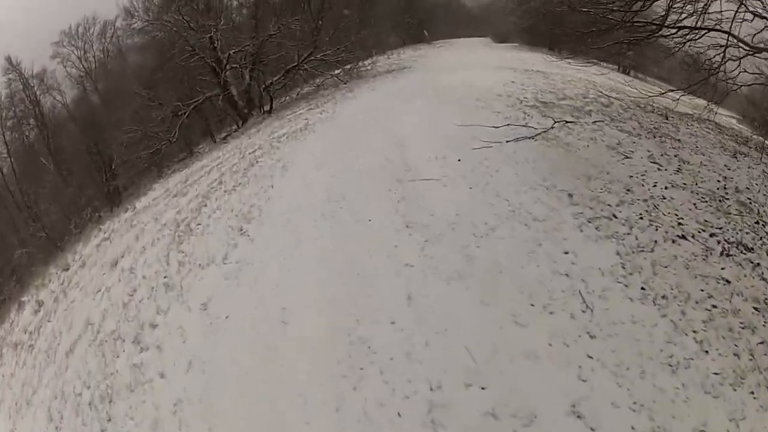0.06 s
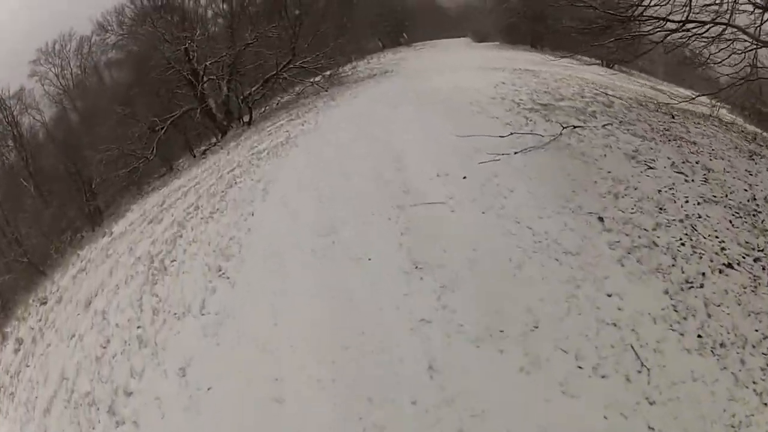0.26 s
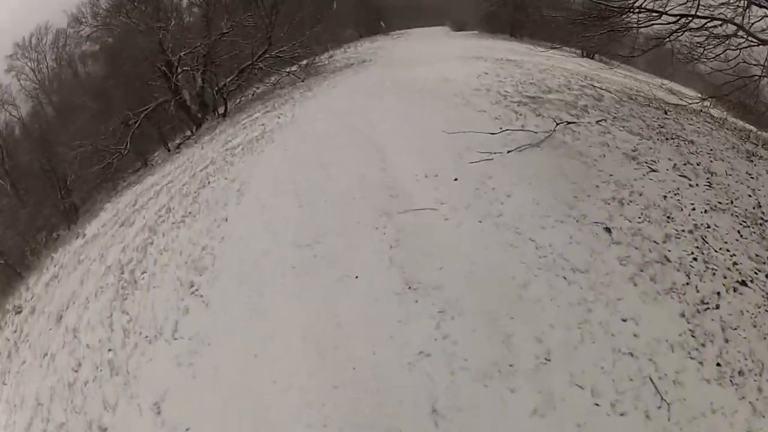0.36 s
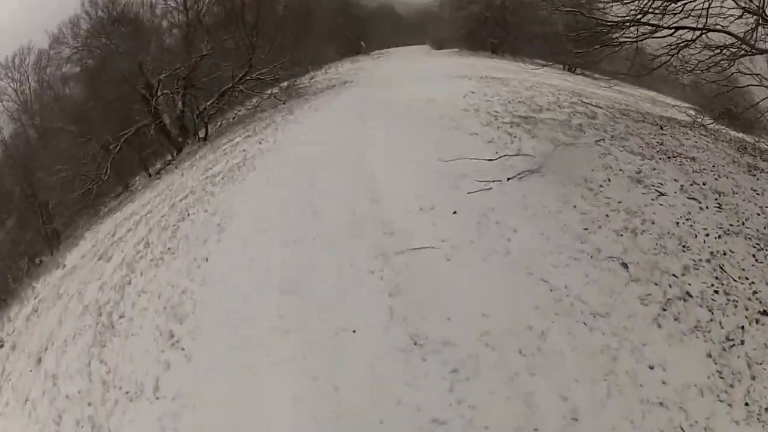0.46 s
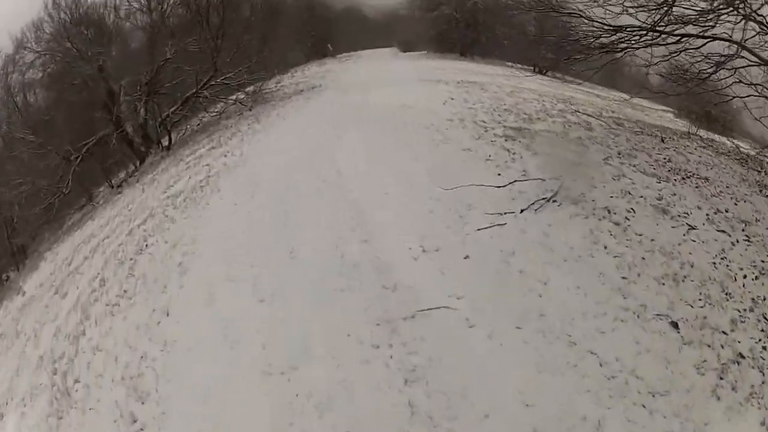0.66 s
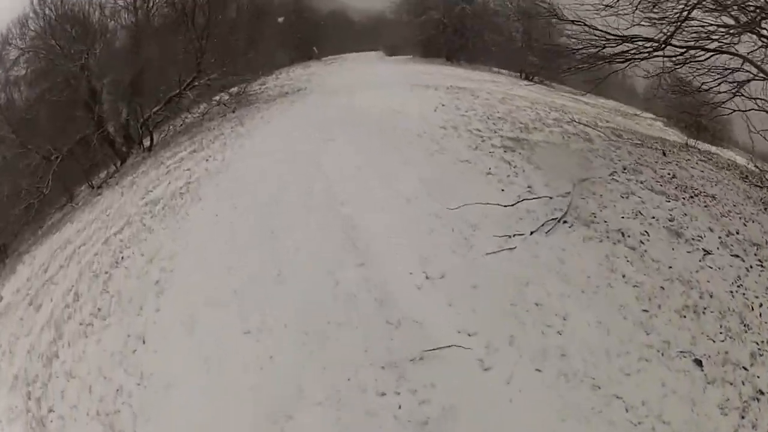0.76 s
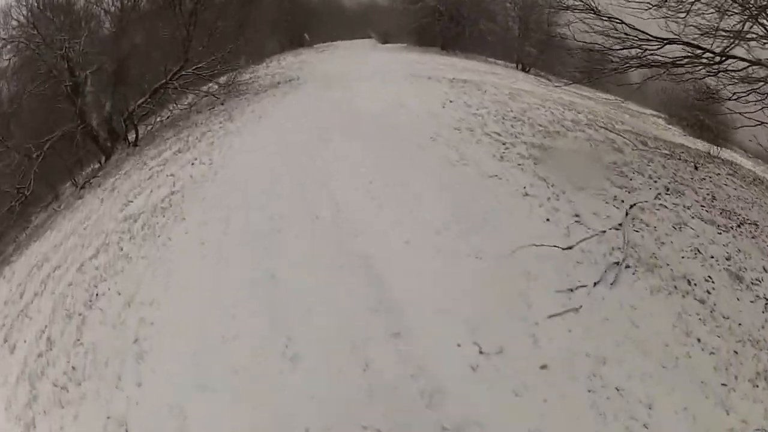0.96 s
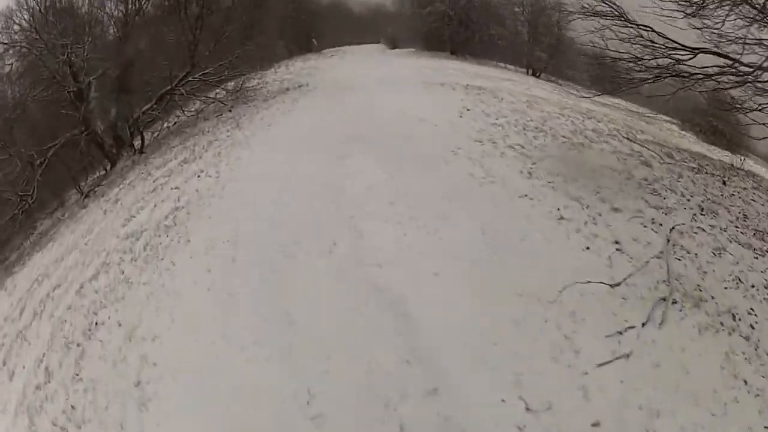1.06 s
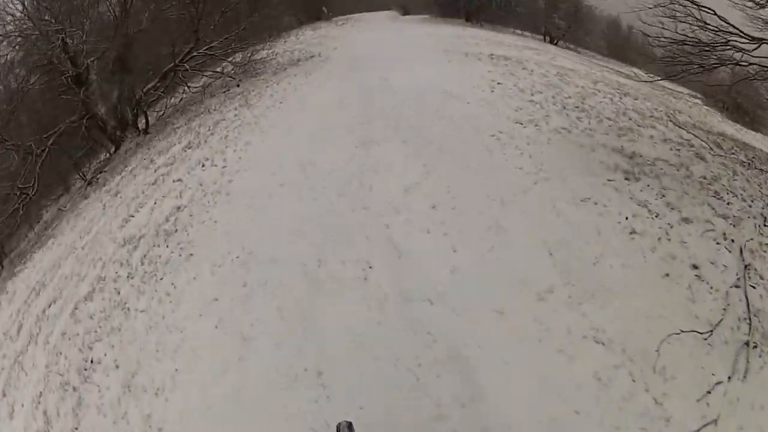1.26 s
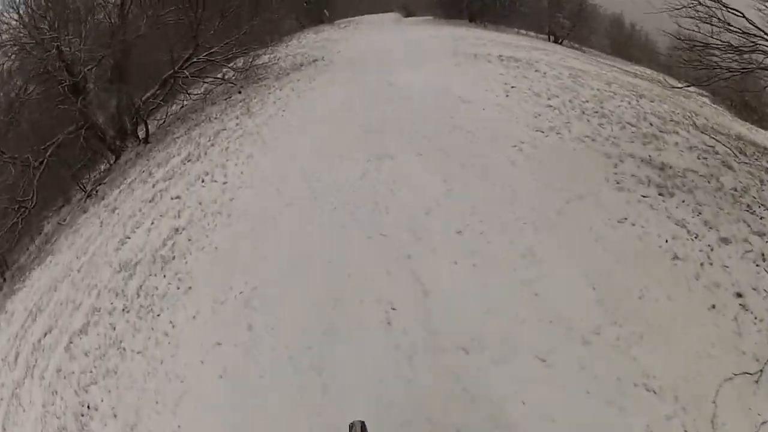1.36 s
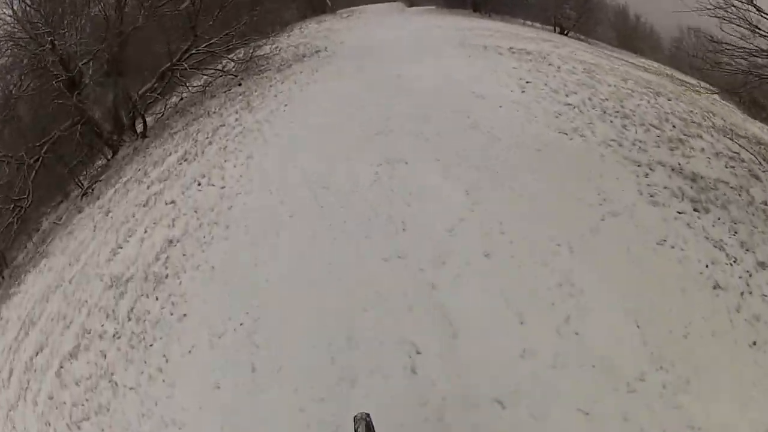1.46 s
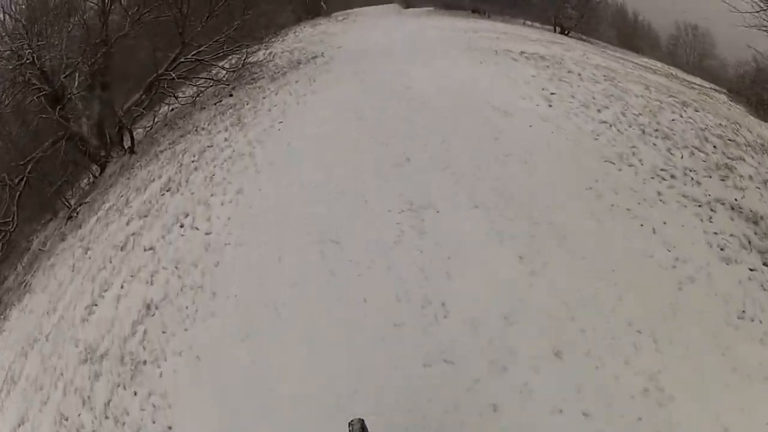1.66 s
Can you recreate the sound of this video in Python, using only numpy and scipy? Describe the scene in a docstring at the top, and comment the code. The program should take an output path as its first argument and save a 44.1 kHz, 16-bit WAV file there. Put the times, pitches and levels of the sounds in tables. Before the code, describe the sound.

A bicycle rolls over crusty snow, heard close and dry from on board. Irregular clicks, pops and light chain rattles sit over a low rumble. Halfway through, the microphone mount knocks hard, then the ticking carries on.

```python
"""Bicycle on thin snow

Heard from a camera riding on the bike. The tyres hiss, pop and crunch through crust, and flick
grit and frozen crumbs against the bike. Bumps thump through the camera mount, shake the chain
and set a small metal part ringing. The mount knocks, once hard. A low rumble lies underneath."""
import sys
import numpy as np
from scipy import signal
from scipy.fft import rfft, irfft, next_fast_len
from scipy.io import wavfile

SR = 44100
rng = np.random.default_rng(int(sys.argv[2]) if len(sys.argv) > 2 else 0)


def wav_out(sig):
    """Save sig, one row per channel (or a flat mono array), as 16-bit PCM at SR to the path in sys.argv[1]."""
    wavfile.write(sys.argv[1], SR, np.round(np.clip(np.atleast_2d(sig).T, -1, 1) * 32767).astype(np.int16))


N = 74970
T = np.arange(SR // 5) / SR  # time within one event, s


def amp(db):
    """Decibels to gain."""
    return 10 ** (np.asarray(db) / 20)


def unit_rms(x):
    """Scale to rms 1."""
    return x / np.sqrt(np.mean(x ** 2) + 1e-20)


def unit_hit(x):
    """Scale to the energy of 3 ms at rms 1."""
    return x * np.sqrt(0.003 * SR) / np.linalg.norm(x)


def gain_curve(rows):
    """Gain per sample from (t/s, level/dB) rows."""
    return amp(np.interp(np.arange(N) / SR, *np.transpose(rows)))


def colour(x, spectrum, tilt_db_oct=0):
    """Minimum-phase filter through (f/Hz, gain/dB) points, plus a tilt."""
    size = 2 * next_fast_len(len(x))
    octave = np.log2(np.fft.rfftfreq(size, 1 / SR) + 1)
    hz, db = np.transpose(spectrum)
    tilt_db = tilt_db_oct * np.maximum(octave - np.log2(hz[0]), 0)
    gain = amp(np.interp(octave, np.log2(hz), db) + tilt_db)
    cepstrum = irfft(np.log(gain))
    cepstrum[1:size // 2] *= 2
    cepstrum[size // 2 + 1:] = 0
    return irfft(rfft(x, size) * np.exp(rfft(cepstrum)))[:len(x)]


def decay(t60_s):
    """Exponential envelope."""
    return 1000 ** (-T / t60_s)


def burst(t60_s):
    """Decaying noise."""
    return unit_hit(rng.standard_normal(len(T)) * decay(t60_s))


def ring(modes):
    """Damped sines from (f/Hz, level/dB, t60/s) rows."""
    return sum(amp(db) * decay(t60_s) * np.sin(2 * np.pi * hz * T) for hz, db, t60_s in modes)


def place(events):
    """Sum (t/s, sound) pairs into N samples."""
    track = np.zeros(N + SR)
    for start_s, sound in events:
        track[max(round(start_s * SR), 0):][:len(sound)] += sound
    return track[:N]


# Rumble spectrum: f/Hz, density/dB
RUMBLE_SPECTRUM = [(15, 3.5), (30, 5), (60, -4), (88, 0), (125, -14), (180, -16), (300, -21.5),
                   (700, -50.5)]
# Rumble envelope: t/s, level/dB
RUMBLE_ENVELOPE = [(0, -45.5), (.14, -51), (.27, -47), (.36, -46.5), (.62, -45.5), (.7, -48), (.95, -42),
                   (1.02, -52), (1.13, -45), (1.2, -50.5), (1.33, -54), (1.45, -45.5), (1.57, -54.5),
                   (1.7, -44)]


def rumble():
    """Low, uneven noise of the ride."""
    return gain_curve(RUMBLE_ENVELOPE) * unit_rms(colour(rng.standard_normal(N), RUMBLE_SPECTRUM))


# Bumps: t/s, level/dB, f/Hz, rise/s
BUMP_HITS = [(0.309, -25, 81.6, 0.011), (0.467, -33, 46, 0.0095), (0.505, -24, 35.7, 0.011),
             (0.604, -35.5, 79.5, 0.017), (0.809, -30.5, 38, 0.017), (0.813, -31.5, 87, 0.0085),
             (0.871, -45.5, 201, 0.0056), (0.895, -30.5, 92, 0.017), (.899, -35, 178, 0.0028),
             (0.889, -33.5, 44.6, 0.012), (1.065, -33, 70.2, 0.016)]


def bumps():
    """Thumps through the mount; each swells and dies within a few cycles."""
    thumps = []
    for start_s, db, hz, rise_s in BUMP_HITS:
        swell = (T / rise_s * np.exp(1 - T / rise_s)) ** 2
        thumps.append((start_s, amp(db) * swell * np.sin(2 * np.pi * hz * T)))
    return place(thumps)


def metal(hz=12030, t60_s=0.09, re_bump_db=-37):
    """Every bump sets a small metal part ringing, faint and shivering."""
    tone = ring([(hz, 0, t60_s)])
    return place((start_s, amp(db + re_bump_db) * unit_hit(signal.fftconvolve(tone, burst(t60_s))))
                 for start_s, db, _, _ in BUMP_HITS)


# Link resonances: f/Hz, gain/dB
LINK_RESPONSE = [(1000, -7), (3000, -6), (4000, -10), (4750, -1), (5380, 6), (6000, -17), (6650, 4),
                 (7300, -6), (8000, -13), (11000, -18), (16000, -25)]


def chink(length_s, clacks_per_s=630, count=20):
    """Links collide in a quick, uneven, fading run."""
    gaps, sizes = rng.uniform(0.5, 2, (2, count))
    times_s = (np.cumsum(gaps) - gaps[0]) / clacks_per_s
    impulses = sizes * rng.choice([-1, 1], count) * np.exp(-(times_s / length_s) ** 2)
    clacks = place(zip(times_s, impulses[:, None]))[:len(T)]
    return unit_hit(colour(clacks, LINK_RESPONSE))


# Chain chinks: t/s, level/dB, length/s
CHAIN_HITS = [(0.398, -53, .008), (0.457, -45.5, 0.011), (0.5027, -44.5, 0.013), (.558, -53.5, 0.0058),
              (0.605, -44.5, 0.009), (0.776, -49.5, 0.009), (0.802, -46, 0.012), (0.8676, -43.5, 0.011),
              (0.921, -48.5, 0.012), (1.063, -50.5, 0.009), (1.098, -50, 0.009), (1.148, -54, 0.006),
              (1.2515, -46, 0.014)]


def chain():
    """The shaken chain chinks."""
    return place((start_s, amp(db) * chink(length_s)) for start_s, db, length_s in CHAIN_HITS)


# Bike struck by a speck: f/Hz, gain/dB
BIKE_RESPONSE = [(500, -16), (1100, -0.5), (1700, 1.5), (2100, -5.5), (2570, 2.5), (2950, -2), (3380, 7),
                 (4100, -6), (4780, 1.5), (6000, -16), (7250, -1.5), (7900, -11.5), (8600, -2.5),
                 (10200, -13), (12000, -29), (14400, -10), (16000, -27)]


def tick(tilt_db_oct=0, scatter_db=1.3, tail_db=-2.5):
    """A hard speck strikes and crumbles, ringing the bike a little differently each time."""
    response = [(hz, db + scatter_db * rng.standard_normal()) for hz, db in BIKE_RESPONSE]
    strike = unit_hit(T == 0) + amp(tail_db) * burst(t60_s=0.015)
    return unit_hit(colour(strike, response, tilt_db_oct))


# Grit impacts: t/s, level/dB, tilt/(dB/octave)
GRIT_HITS = [(.051, -59, 8), (0.059, -52.5, -0.5), (0.0658, -56, -5), (0.101, -51, -0.5),
             (.113, -56.5, -0.5), (.124, -56, -2), (.156, -58, -0.5), (.1675, -57, 2), (.19, -48.5, 0.5),
             (.2025, -46, -1), (0.2213, -48.5, -0.5), (0.2662, -45.5, -7.5), (0.3537, -40.5, 0.5),
             (0.3665, -53, -0.5), (0.3817, -52, 0), (.5852, -49, -5), (0.6045, -47.5, 1), (.7, -57, 3.5),
             (.784, -49, -1.5), (.82, -43, -5), (0.853, -51, -1), (0.8683, -42.5, 0), (0.873, -46.5, -3.5),
             (0.894, -50.5, -7), (.912, -45.5, -0.5), (0.9334, -42.5, 0), (1.0047, -54.5, -3),
             (1.028, -49, -1.5), (1.063, -49, -5.5), (1.092, -49, -0.5), (1.1286, -55, -1.5),
             (1.2, -42.5, -1.5), (1.209, -37.5, 0.5), (1.3202, -65, 8), (1.427, -29, -0.5), (1.451, -57, 0),
             (1.4902, -61, -9), (1.524, -56, -1), (1.561, -46, -5.5), (1.6872, -47.5, -2)]


def grit():
    """Specks flung by the tyres tick sharply on the bike."""
    return place((start_s, amp(db) * tick(tilt)) for start_s, db, tilt in GRIT_HITS)


# Snow grain breaking: f/Hz, density/dB
CRUSH_SPECTRUM = [(200, -5), (500, 5.5), (700, -7.5), (1100, 2.5), (1900, 13.5), (2600, -5), (3400, 1.5),
                  (4300, -10), (5200, -21), (6000, -24), (7000, -27), (10200, -5.5), (12000, -27),
                  (14000, -4), (16000, -24)]
# High ring of a ping: f/Hz, level/dB, t60/s
PING_MODES = [(2850, -39, 0.002), (3300, -8, 0.011), (8580, 2, 0.024), (10100, 9, 0.015), (13760, 6, 0.015)]


def ping(hz, cycles, crush_db, ring_db=-12.5, attack_s=0.00048):
    """A soft lump breaks: brief tone, short crush, faint high ring."""
    tone = np.sin(2 * np.pi * hz * T) * decay(cycles / hz) * (1 - np.exp(-T / attack_s))
    crush = unit_hit(colour(burst(t60_s=0.037), CRUSH_SPECTRUM))
    high_ring = unit_hit(ring(PING_MODES))
    return unit_hit(unit_hit(tone) + amp(crush_db) * crush + amp(ring_db) * high_ring)


# Crumb impacts: t/s, level/dB, f/Hz
CRUMB_HITS = [(.067, -46.5, 952), (0.1402, -48, 1760), (.19, -56, 1840), (0.2025, -44.5, 1030),
              (0.232, -49, 2040), (0.2428, -38.5, 1765), (0.267, -46, 1700), (0.3168, -43, 1460),
              (.338, -49, 1980), (.44, -49.5, 1690), (0.494, -44.5, 1915), (0.5835, -44.5, 2200),
              (0.7, -48.5, 1890), (.716, -51, 1700), (0.959, -48.5, 2030), (0.971, -48, 1960),
              (1.0135, -46.5, 1100), (1.013, -50, 1620), (1.05, -48, 830), (1.2326, -35, 1773),
              (1.32, -48, 1790), (1.369, -49, 830), (1.41, -48.5, 1680), (1.427, -39.5, 1130),
              (1.4583, -49.5, 1930), (1.4902, -49, 1830), (1.537, -38, 1770), (1.55, -49, 1700),
              (1.5796, -47, 1880), (1.674, -47, 1870)]


def crumbs():
    """Larger lumps of snow hit the bike with duller pings."""
    return place((start_s, amp(db) * ping(hz, cycles=22, crush_db=-3)) for start_s, db, hz in CRUMB_HITS)


def pops(per_s=105, spread_db=3, centre_hz=1934, spread_oct=0.43, edge_db=-6):
    """Snow grains pop at random under the tread, some harder than others; rms 1."""
    count = round(per_s * N / SR)
    edge = amp(edge_db) * tick()
    grains = []
    for size, pitch, edge_gain in np.clip(rng.standard_normal((count, 3)), -2, 2):
        body = ping(centre_hz * 2 ** (spread_oct * pitch), cycles=21, crush_db=0)
        grains.append(amp(spread_db * size) * (body + edge_gain * edge))
    times_s = rng.random(count) * N / SR
    return unit_rms(place(zip(times_s, grains)))


# Tyre breaking crust: t/s, length/s, level/dB
CRUST_BREAKS = [(0.056, 0.013, -64), (0.309, 0.013, -45.5), (0.45, 0.024, -47), (0.493, 0.022, -47),
                (0.554, 0.025, -48), (0.599, 0.034, -52.5), (0.801, 0.011, -49.5), (0.825, 0.024, -50),
                (0.862, 0.026, -45.5), (0.887, 0.055, -54.5), (1.055, 0.018, -49.5)]
# Crunch spectrum: f/Hz, density/dB
CRUST_SPECTRUM = [(150, -6.5), (450, 1.5), (700, -4), (1000, 8.5), (1250, -3.5), (1600, 1), (2300, 2.5),
                  (3500, -13.5), (5200, -26), (6000, -31), (7000, -28.5), (10200, -10), (12000, -35),
                  (14200, -12), (16000, -37)]


def crunches(grains_per_s=2200, spread_db=2):
    """The crust gives under the tyre in short, dense showers of impulses."""
    pressure = place((start_s, amp(db) * np.sqrt(abs(np.sin(np.pi * np.minimum(T / length_s, 1)))))
                     for start_s, length_s, db in CRUST_BREAKS)
    sizes = amp(spread_db * np.clip(rng.standard_normal(N), -2, 2))
    signs = rng.choice([-1, 1], N)
    breaks = rng.random(N) < grains_per_s / SR
    return pressure * unit_rms(colour(sizes * signs * breaks, CRUST_SPECTRUM))


# Rolling noise envelope: t/s, level/dB
ROLL_ENVELOPE = [(0.0, -60), (0.132, -59.5), (0.26, -59.5), (0.42, -56.5), (0.62, -59.5), (0.95, -58.5),
                 (1.23, -58.5), (1.7, -55.5)]
# Tyre on snow: f/Hz, density/dB
SNOW_SPECTRUM = [(120, 2), (260, 2), (450, 1), (650, -7.5), (1000, 4), (1300, -8.5), (1850, -3), (2600, -6),
                 (3400, -18.5), (4300, -19), (5200, -17.5), (6000, -42), (7000, -25.5), (10200, -18.5),
                 (12000, -28), (14000, -19), (16000, -34)]


def tyres(hush_db=-1.82, pops_db=-5.5):
    """Tread rolls on snow: a steady hush with small pops and occasional crunches."""
    hush = unit_rms(colour(rng.standard_normal(N), SNOW_SPECTRUM))
    return crunches() + gain_curve(ROLL_ENVELOPE) * (amp(hush_db) * hush + amp(pops_db) * pops())


# Hollow modes of the mount: f/Hz, level/dB, t60/s
MOUNT_MODES = [(408, -25.5, 0.052), (507, -15.5, 0.02), (725, -22, 0.013), (844, -29, 0.071),
               (1038, -34, 0.046), (1360, -29.5, 0.023), (1850, -22.5, 0.022)]
# Thin buzz of the mount: f/Hz, density/dB
BUZZ_SPECTRUM = [(3000, -5), (9000, -30), (10000, 4), (11200, -2), (12000, 5), (12900, -6), (13900, 2),
                 (15000, -27)]
# Mount knocks: t/s, level/dB, contact/s
MOUNT_HITS = [(0.368, -29, 0.0014), (0.584, -26, 0.00025), (0.603, -24, .0002), (0.8108, 0.5, 0.00022),
              (0.9013, -22.5, 0.00018), (0.9042, -2, 0.0029), (0.9119, -23.5, 0.00046)]


def mount(band_hz=(330, 2160), buzz_db=-37.5):
    """The camera mount knocks and rebounds; longer contact gives a duller knock with less buzz."""
    bandpass = signal.butter(3, band_hz, "band", fs=SR, output="sos")
    response = signal.sosfilt(bandpass, ring(MOUNT_MODES))
    shortest_s = min(contact_s for _, _, contact_s in MOUNT_HITS)
    knocks = []
    for start_s, db, contact_s in MOUNT_HITS:
        force = np.sin(np.pi * np.minimum(T / contact_s, 1))
        body = signal.fftconvolve(response, force / force.sum())[:len(T)]
        buzz = unit_hit(colour(burst(t60_s=0.034), BUZZ_SPECTRUM))
        hardness = shortest_s / contact_s
        knocks.append((start_s, amp(db) * (body + hardness * amp(buzz_db) * buzz)))
    return place(knocks)


def scene():
    """All sources close and dry, mono."""
    return (tyres() + grit() + crumbs() + chain() + mount() + metal() + bumps() + rumble())[None]


def record(dry):
    """Band limit of the camera: brick-wall low-pass."""
    cutoff_hz = 15700
    size = next_fast_len(N + SR // 2)
    passband = np.fft.rfftfreq(size, 1 / SR) < cutoff_hz
    return irfft(rfft(dry, size) * passband, size)[:, :N]


dry = scene()
out = record(dry)
wav_out(out)
```